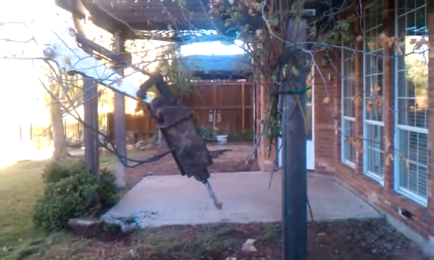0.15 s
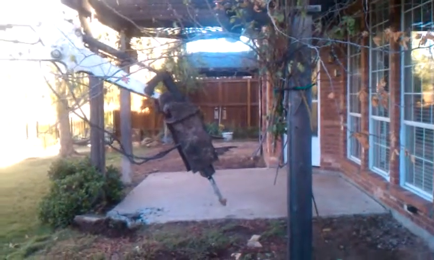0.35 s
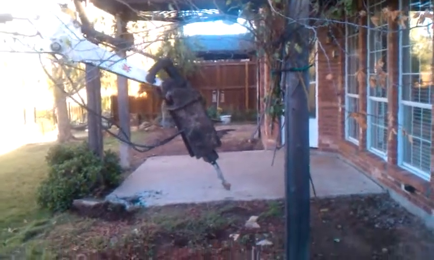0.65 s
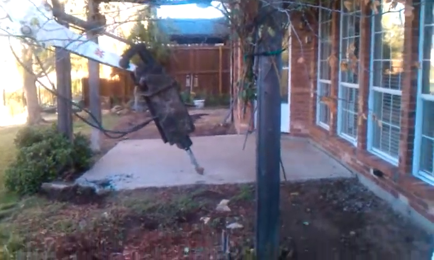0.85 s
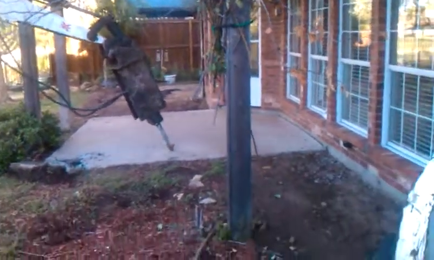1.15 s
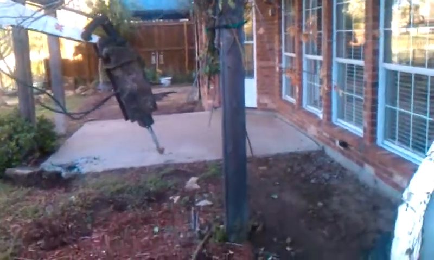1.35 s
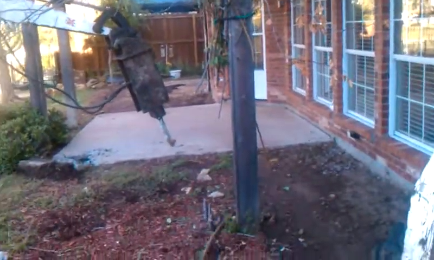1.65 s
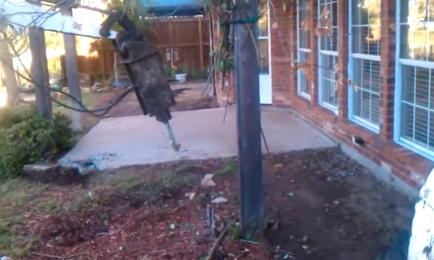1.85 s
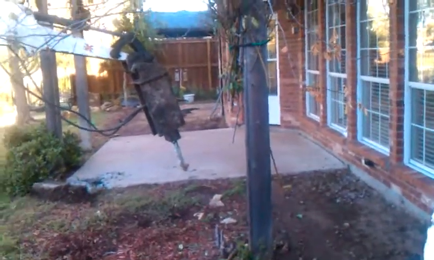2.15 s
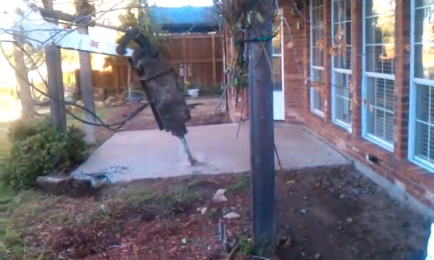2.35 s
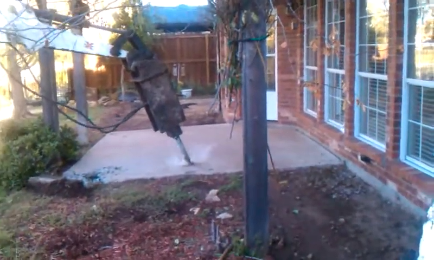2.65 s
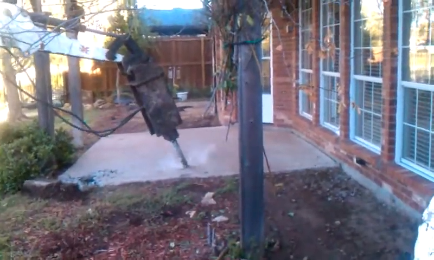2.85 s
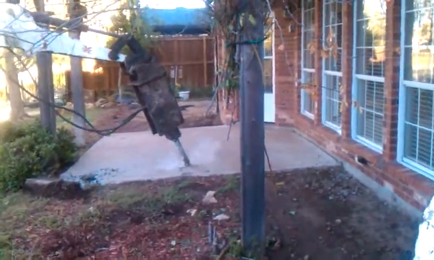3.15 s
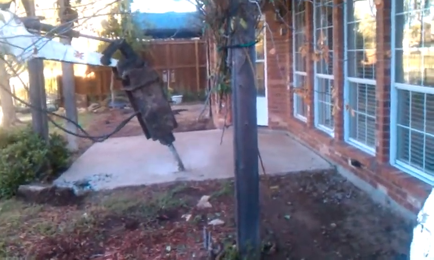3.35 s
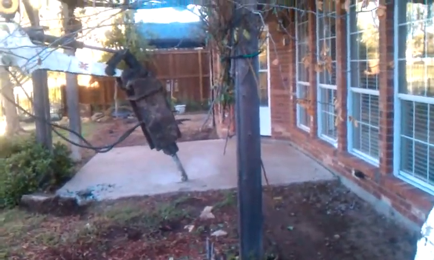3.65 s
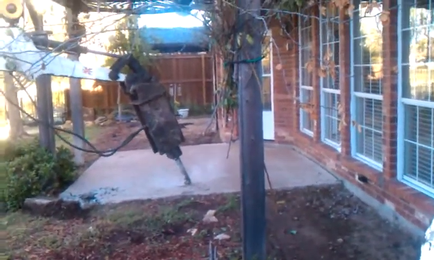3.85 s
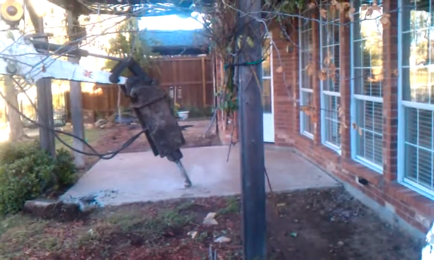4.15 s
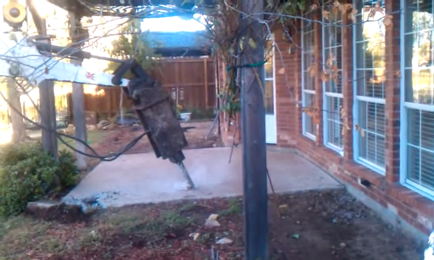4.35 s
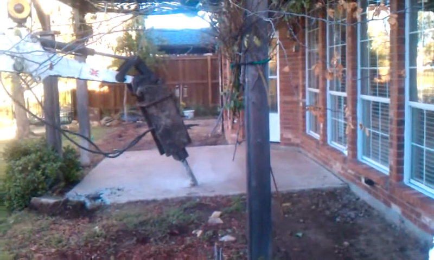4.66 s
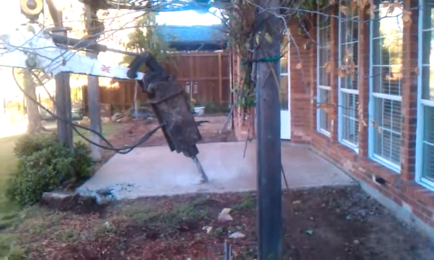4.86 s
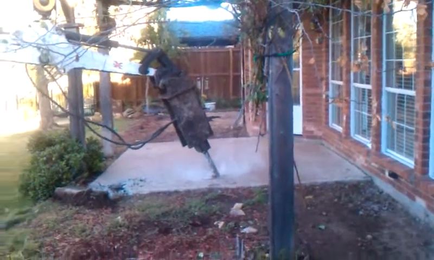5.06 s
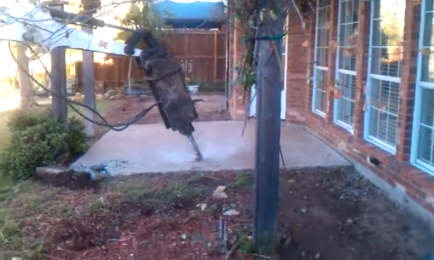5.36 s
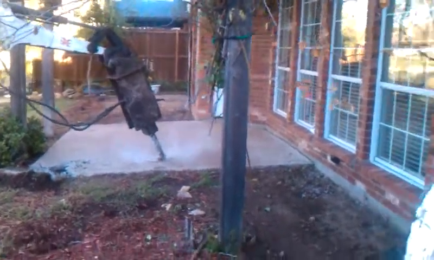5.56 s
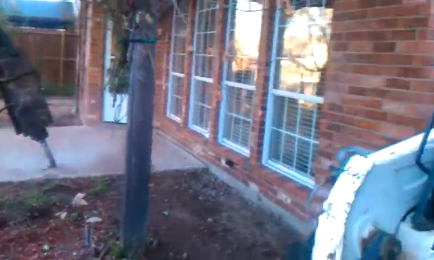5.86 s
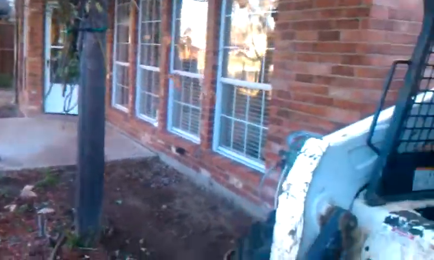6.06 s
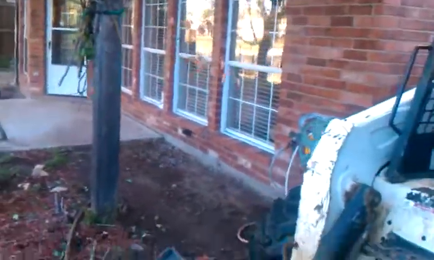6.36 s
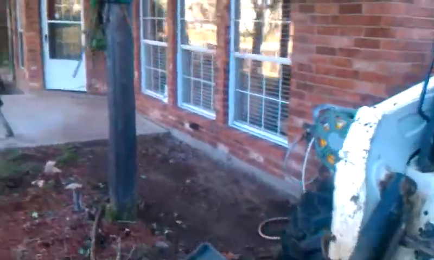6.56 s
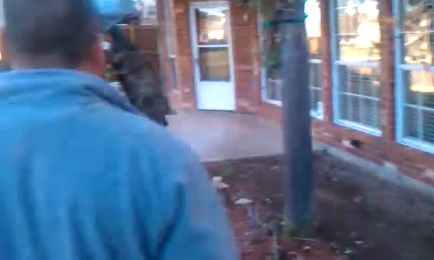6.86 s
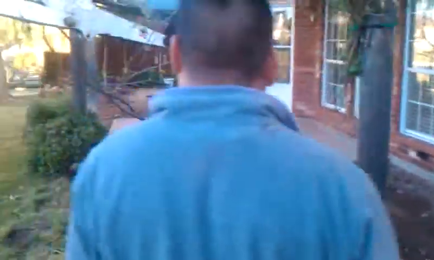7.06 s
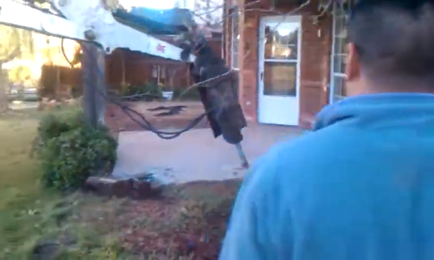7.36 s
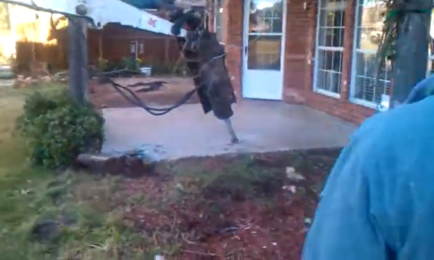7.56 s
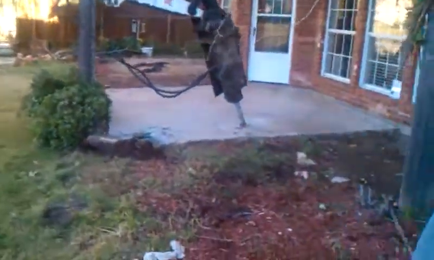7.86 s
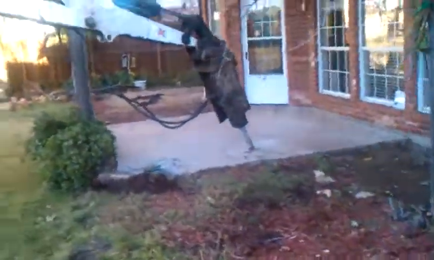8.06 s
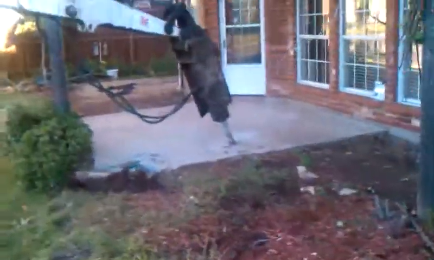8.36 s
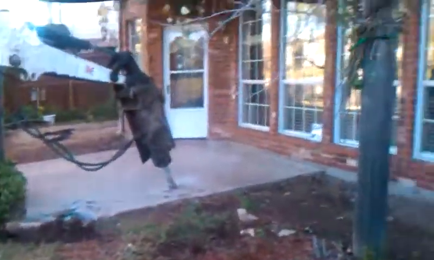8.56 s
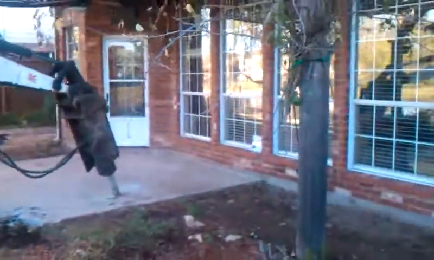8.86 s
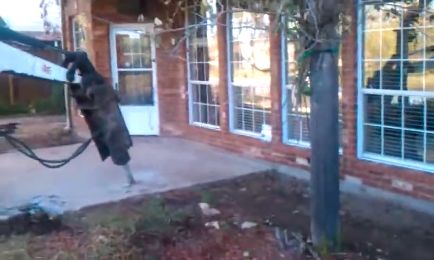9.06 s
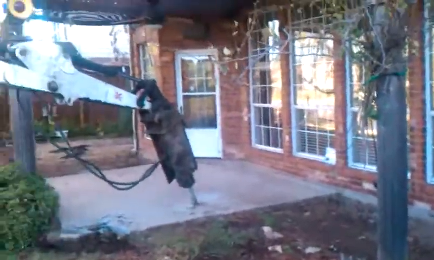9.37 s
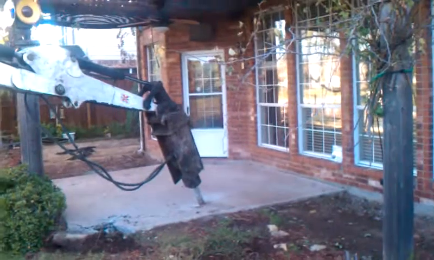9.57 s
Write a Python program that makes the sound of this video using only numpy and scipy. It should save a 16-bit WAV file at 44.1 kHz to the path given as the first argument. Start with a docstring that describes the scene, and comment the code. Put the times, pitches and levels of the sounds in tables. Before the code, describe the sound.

From 0 s a diesel engine clatters roughly, with a fluttering, narrow hiss of hydraulic oil. Dull knocks come at about 0.5, 0.7 and 0.9 s as a heavy chisel touches a concrete patio; a pump whine swells around 1.5 to 2 s, with another low thud near 1.9 s and the hiss rising. At 2.2 s one hard blow cracks and rings. From about 2.4 s the breaker hammers around nine times a second, with only a slight stumble near 4.2 s, where a faint dry tick falls. Blows boom low, clang and rattle with concrete grit, reflected by brick walls; early ones sing brightly. After 6 s the walking listener's shifting position changes the balance: panel ringing emerges, hiss swoops downward near 6.7 and 8.6 s, and hammering quickens to about ten a second, continuing to the end near 9.7 s. The microphone is narrow-band, with compressed level.

```python
"""A diesel engine clatters and oil hisses while a chisel is set down with dull knocks on a concrete patio.
Then the excavator's hydraulic breaker strikes once and hammers nine to ten times a second beside a brick wall.
Engine and pump are sines and pulsed noise at the firing rate; oil is narrow noise on gliding resonances.
Each blow is a click that drives echoes (boom, slab, steel, chips), thuds, noise bursts and ringing modes.
Level curves follow the listener's walk round the machine; a gain control holds down what exceeds its target."""
import sys
import numpy as np
from scipy import signal
from scipy.fft import rfft, irfft, next_fast_len
from scipy.io import wavfile
from scipy.ndimage import uniform_filter1d

SR = 44100
rng = np.random.default_rng(int(sys.argv[2]) if len(sys.argv) > 2 else 0)


def file_out(sig):
    """Save sig as 16-bit WAV at sys.argv[1]."""
    # one column per channel
    cols = np.atleast_2d(sig).T
    # limit, then scale
    lim = np.clip(cols, -1, 1)
    pcm = np.round(lim * 32767).astype(np.int16)
    wavfile.write(sys.argv[1], SR, pcm)


N = 429093
TIME = np.arange(N) / SR
FIRST_BLOW_S = 2.218
RETURN_S = 0.068  # from the blow to the piston's turn

# breaker parts along the walk: time_s, boom_db, housing_knock_db, slab_crack_db, housing_ring_db
PARTS_HEARD = [(2.3, 2.5, -9.5, 5, -14.5), (2.9, 3, -4, 3.5, -8.5), (3.3, 2.5, -1, 1.5, -2),
               (4.0, 4.5, 1.5, 5.5, 2), (4.4, 3.5, -0.5, 3, -4), (4.9, 3.5, 1.5, 3, -1.5),
               (5.7, 4.5, 0, 3.5, -3), (6.25, 5.5, -3, 7.5, -6), (6.65, 1, -18, 0.5, -13),
               (7.5, 1, -14, 4, -10), (8.5, -0.5, -6, 1, -10.5), (9.1, 1.5, -11.5, 1.5, -9),
               (9.7, 4.5, -6, -0.5, -15)]
# steel and tip along the walk: time_s, clang_and_chips_db, direct_crack_db
STEEL_HEARD = [(2.3, 0, -31), (3.3, -1.5, -25.5), (4.2, 1.5, -29.5), (6.15, -0.5, -24.5), (6.3, -1.5, -28),
               (6.55, -2.5, -30), (6.7, 1.5, -29), (7.3, 0, -26), (7.8, 0, -24), (9.7, -1.5, -23.5)]


def from_db(db):
    """Decibels to amplitude gain."""
    return 10 ** (np.asarray(db) / 20)


def rms_one(x):
    """Scale to unit rms."""
    return x / np.sqrt(np.mean(np.abs(x) ** 2) + 1e-20)


def in_time(rows):
    """Each column of a curve, interpolated at every sample."""
    s, *columns = np.transpose(rows)
    return [np.interp(TIME, s, column) for column in columns]


def low_pass(x, hz, order=2):
    """Butterworth low-pass."""
    return signal.sosfilt(signal.butter(order, hz, fs=SR, output="sos"), x)


def high_pass(x, hz, order):
    """Butterworth high-pass."""
    return signal.sosfilt(signal.butter(order, hz, "high", fs=SR, output="sos"), x)


def complex_noise():
    """White noise with independent real and imaginary parts, to be shifted in pitch."""
    return rng.standard_normal(N) + 1j * rng.standard_normal(N)


def drift(hz):
    """Random wander through normal knots of spread 1, hz knots per second."""
    knots = rng.standard_normal(int(N / SR * hz) + 2)
    return np.interp(TIME * hz, np.arange(len(knots)), knots)


def clicks(times_s, sizes):
    """Single-sample impulses."""
    out = np.zeros(N + SR)
    out[np.round(np.asarray(times_s) * SR).astype(int)] = sizes
    return out[:N]


def ring(drive, hz, t60_s):
    """Two-pole resonator: a unit click starts a decaying sine of height 1."""
    radius = from_db(-60 / (t60_s * SR))
    angle = 2 * np.pi * hz / SR
    return signal.lfilter([0, np.sin(angle)], [1, -2 * radius * np.cos(angle), radius ** 2], drive + 1e-18)


def knock(drive, hz, t60_s):
    """Soft contact: two equal resonators in series make the sine swell to height 1, then die."""
    rise = t60_s * SR / np.log(1000)
    return ring(ring(drive, hz, t60_s), hz, t60_s) * 2 * np.e / rise


def burst(drive, low_hz, high_hz, t60_s):
    """Each click starts decaying band noise, of rms 1 at first for a unit click."""
    band = signal.butter(2, [low_hz, high_hz], "band", fs=SR, output="sos")
    noise = signal.sosfilt(band, rng.standard_normal(N))
    decay = np.exp(-np.log(1000) / (t60_s * SR))
    return rms_one(noise) * signal.lfilter([1], [1, -decay], drive + 1e-18)


def modes(drive, table, waver_db, voice=ring):
    """Struck metal: each mode takes a wandering share of the drive; neighbours have opposite sign."""
    out = 0
    for k, (hz, db, t60_s) in enumerate(table):
        share = from_db(db + waver_db * drift(9))
        out = out + (-1) ** k * voice(drive * share, hz, t60_s)
    return out


def colour(x, spectrum):
    """Shape white sound of unit spread to a density in dB per Hz, falling off beyond the table's ends."""
    hz, db = np.transpose(spectrum)
    n = next_fast_len(N + SR // 10)
    log_hz = np.log(np.arange(n // 2 + 1) * SR / n + 1e-9)
    beyond = np.abs(log_hz - np.clip(log_hz, np.log(hz[0]), np.log(hz[-1])))
    gain = from_db(np.interp(log_hz, np.log(hz), db)) * np.exp(-2 * beyond)
    return irfft(rfft(x, n) * gain, n)[:N] * np.sqrt(SR / 2)


def shifting_colour(x, patchy_db, count=18):
    """No two blows break the concrete alike: overlapping bands swell and sink independently."""
    n = next_fast_len(N)
    spectrum = rfft(x, n)
    band = np.interp(np.arange(n // 2 + 1) * SR / n, [300, 4200], [0, count - 1])
    out = 0
    for k in range(count):
        part = irfft(spectrum * np.maximum(1 - np.abs(band - k), 0), n)[:N]
        out = out + from_db(patchy_db * drift(24)) * part
    return out


def echo_pattern(shape, count=4):
    """Dense echoes under an envelope, alternately flattened in spectrum and in time."""
    echoes = shape * rng.standard_normal(len(shape))
    for _ in range(count):
        echoes = irfft(np.exp(1j * np.angle(rfft(echoes))), len(shape))
        echoes = echoes * shape / np.sqrt(np.abs(uniform_filter1d(echoes ** 2, size=200)) + 1e-20)
    return echoes


def reverberate(drive, spectrum, hold_s, t60_s, alike, count):
    """Walls and roof hold each contact, then it decays: repeated echoes (power share alike) and fresh rattle."""
    shape = np.exp(-np.log(1000) * np.maximum(TIME[:SR // 3] - hold_s, 0) / t60_s)
    power = np.maximum(signal.oaconvolve(drive ** 2, shape ** 2)[:N], 0)
    scale = np.sqrt(power[TIME > FIRST_BLOW_S].mean())
    # the echo pattern changes from place to place along the walk
    place = np.interp(TIME, [FIRST_BLOW_S, TIME[-1]], [0, count - 1])
    echoes = 0
    for k in range(count):
        nearness = np.cos(np.pi / 2 * np.minimum(np.abs(place - k), 1))
        echoes = echoes + nearness * signal.oaconvolve(drive, echo_pattern(shape))[:N]
    rattle = np.sqrt(power) * rng.standard_normal(N)
    return colour(np.sqrt(alike) * echoes + np.sqrt(1 - alike) * rattle, spectrum) / scale


def pump_whine(firings):
    """Oil pump: a sine at six times the firing rate, louder while the boom presses the chisel down."""
    start_s, end_s, ramp_s = 1.5, 2, 0.31
    loaded_db, easy_db = -40.5, -56
    level_db = np.interp(TIME, [start_s - ramp_s, start_s, end_s, end_s + ramp_s],
                         [easy_db, loaded_db, loaded_db, easy_db])
    return np.sqrt(2) * from_db(level_db + 2.2 * drift(15)) * np.sin(2 * np.pi * 6 * firings)


def exhaust_and_fan(firings):
    """Exhaust harmonics of the firing rate and the cooling fan's hum, each wavering in level."""
    # firing_multiple, level_db
    exhaust_tones = [(1, -44.5), (2, -39.5), (3, -51), (4, -45)]
    out = 0
    for multiple, db in exhaust_tones:
        level = from_db(db + 0.96 * drift(11))
        out = out + level * np.sin(2 * np.pi * (multiple * firings + rng.random()))
    fan = from_db(-45 + 2 * drift(8)) * np.sin(2 * np.pi * 4.42 * firings)
    return np.sqrt(2) * (out + fan)


def clatter(firings):
    """Engine clatter: coloured noise in which each firing starts hard and fades, with uneven strength."""
    # pitch_hz, density_db_per_hz
    spectrum = [(30, -89.5), (55, -67.5), (85, -66), (130, -66), (210, -60), (300, -65.5), (390, -61),
                (600, -62.5), (800, -62), (950, -59), (1130, -62.5), (1250, -57.5), (1400, -58.5),
                (3000, -61), (4400, -78.5)]
    uneven_db = 0.99 * rng.standard_normal(int(firings[-1]) + 1)[firings.astype(int)]
    pulsing = rms_one(from_db(uneven_db - 2.5 * (firings % 1)))
    return pulsing * colour(rng.standard_normal(N), spectrum)


def oil_surges(blow_times_s):
    """Gain of the oil's hiss, rms 1 while hammering: it jumps with each blow and sinks until the next."""
    surge_db, decay_s = 3.5, 0.019  # the jump before scaling to rms 1
    since_s = TIME - np.r_[-1, blow_times_s][np.searchsorted(blow_times_s, TIME)]
    hammering = TIME > blow_times_s[0]
    surge = from_db(surge_db * np.exp(-since_s / decay_s))
    return np.where(hammering, surge / np.sqrt(np.mean(surge[hammering] ** 2)), 1)


def oil_hiss(firings, blow_times_s):
    """Oil rushing through the valve block: noise bands on a gliding resonance and two multiples of it."""
    # time_s, resonance_hz, level_db
    flow = [(0, 1760, -30), (.9, 1745, -31), (1.4, 1777, -30), (2.19, 1862, -23.5), (2.28, 1957, -28.5),
            (4, 2100, -30.5), (5.9, 1695, -30.5), (6.5, 1505, -26), (8.3, 1475, -27.5), (9.73, 1421, -30)]
    # resonance_multiple, width_hz, level_db
    valve_bands = [(1, 220, 2.5), (1.26, 242, -5), (1.55, 140.5, -6)]
    oil_hz, oil_db = in_time(flow)
    wander = np.where(TIME > blow_times_s[0], 0.024, 0.011)  # hammering unsettles the flow
    phase = 2 * np.pi * np.cumsum(oil_hz * (1 + wander * drift(16))) / SR
    oil = 0
    for multiple, width_hz, db in valve_bands:
        swirl = low_pass(low_pass(complex_noise(), width_hz / 2, order=1), 600)
        clumps = from_db(2 * drift(36) + 2.3 * drift(350))
        oil = oil + from_db(db) * rms_one(clumps * (swirl * np.exp(1j * multiple * phase)).real)
    flutter_db = 1.0 * np.cos(2 * np.pi * firings)  # the pump pushes harder at each firing
    return from_db(oil_db + flutter_db) * oil_surges(blow_times_s) * oil


def excavator(blow_times_s):
    """Exhaust, fan, pump and clatter share one wandering count of diesel firings; the oil flutters with it."""
    # time_s, firings_per_s, clatter_db, exhaust_and_fan_db
    engine = [(0, 88, 0, -10), (.65, 91, -0.3, -1), (1.0, 89, 0, -1), (2.15, 92, 2.5, 0), (2.5, 90, 2, -5),
              (5.5, 87, 4.5, 1.5), (7, 87, 5, -3.5), (9.73, 93.5, 5, -4)]
    firing_hz, clatter_db, exhaust_db = in_time(engine)
    firings = np.cumsum(firing_hz * (1 + 0.004 * drift(14))) / SR
    tones = from_db(exhaust_db) * exhaust_and_fan(firings) + pump_whine(firings)
    return tones + from_db(clatter_db) * clatter(firings) + oil_hiss(firings, blow_times_s)


def swoops(width_hz=300):
    """The oil's hiss swoops down as the listener turns: a narrow noise band swells, slides and fades."""
    # centre_s, length_s, from_hz, to_hz, level_db
    slides = [(6.715, .55, 2533, 1837, -27), (8.57, .2, 2223, 1750, -23.5)]
    swirl = low_pass(complex_noise(), width_hz / 2)
    out = 0
    for s, length_s, from_hz, to_hz, db in slides:
        hz = np.interp(TIME, [s - length_s / 2, s + length_s / 2], [from_hz, to_hz])
        hiss = rms_one((swirl * np.exp(2j * np.pi * np.cumsum(hz) / SR)).real)
        swell = np.exp(-np.minimum(np.abs(2 * (TIME - s) / length_s), 2 * np.e) ** 2)
        out = out + from_db(db) * swell * hiss
    return out


def tick():
    """One faint dry tick: a click through a one-pole filter."""
    return signal.lfilter([1], [1, -0.9], clicks([4.199], from_db(-12.5)))


def knocks():
    """The chisel is set down: decaying noise and a soft ring at each contact, the last with the first blow."""
    # start_s, noise_db, upper_edge_hz, noise_t60_s, ring_hz, ring_db
    contacts = [(.512, -29.5, 1400, .06, 876, -27), (0.737, -26.5, 503, 0.07, 375, -28),
                (.92, -19, 2183, 0.084, 248, -33), (0.934, -22, 596, 0.09, 196, -20),
                (1.862, -31, 262, .15, 168, -19.5), (2.218, -14, 3600, 0.036, 980, -24)]
    white = high_pass(rng.standard_normal(N), 145, order=4)
    out = 0
    for s, db, top_hz, t60_s, ring_hz, ring_db in contacts:
        envelope = (TIME >= s) * np.exp(-np.log(1000) * np.clip(TIME - s, 0, 1) / t60_s)
        noise = from_db(db) * rms_one(low_pass(white, top_hz, order=3)) * envelope
        out = out + noise + knock(clicks([s], from_db(ring_db)), ring_hz, t60_s=0.067)
    return out


def blows():
    """Times and strengths (dB) of the blows: one alone, then two runs with a gap shorter than one blow between
    them."""
    # start_s, end_s
    runs = [(2.362, 4.21), (4.256, 9.7)]
    # hammering follows the oil flow: time_s, blows_per_s
    rate = [(2.4, 8.806), (2.85, 9.021), (3.3, 8.537), (4.2, 9.239), (5.5, 9.46), (6.5, 9.671),
            (6.85, 10.067), (7.9, 10.195), (8.3, 9.868), (8.8, 10.285)]
    times_s = []
    for s, end_s in runs:
        while s < end_s:
            times_s.append(s)
            s += 1 / np.interp(s, *np.transpose(rate))
    return np.r_[FIRST_BLOW_S, times_s], np.r_[0, rng.normal(0, 0.5, len(times_s))]


def after(hits, delay_s, db):
    """A further contact after each blow, a little uneven in time and strength."""
    jitter, spread_db = 0.008, 0.24  # jitter is a share of the delay
    s, blow_db = hits
    late, strong = rng.standard_normal((len(s), 2)).T
    return clicks(s + delay_s * (1 + jitter * late), from_db(blow_db + db + spread_db * strong))


def boom(hits, strike):
    """Ground, slab and steel boom low under the blow and again as the piston turns."""
    # pitch_hz, density_db_per_hz
    spectrum = [(30, -83.5), (50, -69), (80, -61), (125, -59.5), (172, -54), (205, -58), (240, -53.5),
                (290, -55), (380, -59), (480, -62), (700, -81.5)]
    boom_db = in_time(PARTS_HEARD)[0]
    drive = strike + after(hits, RETURN_S, -2.0)
    return from_db(boom_db) * reverberate(drive, spectrum, hold_s=0.04, t60_s=0.22, alike=0.46, count=5)


def thuds(hits):
    """The machine's weight lands as it recoils, settles and the piston turns; the slab rings on a little."""
    # delay_s, pitch_hz, t60_s
    landings = [(0.0106, 185, 0.054), (.026, 227.4, .04), (.0705, 205, .038)]
    # along the walk: time_s, recoil_db, settling_db, return_db
    heard = [(2.3, -30.5, -37, -39.5), (2.75, -25, -36.5, -36.5), (3.3, -23.5, -28, -35),
             (3.7, -17.5, -20.5, -28.5), (4.6, -18.5, -25, -26), (5.7, -17, -25, -29),
             (6.3, -19.5, -21, -22), (6.5, -21, -20, -27), (6.65, -29.5, -27, -23.5),
             (7.5, -29.5, -23, -20.5), (8.05, -40, -33, -29.5), (8.18, -23, -20.5, -17),
             (8.5, -30, -30, -25.5), (8.9, -24, -27, -18.5), (9.6, -24.5, -20, -20)]
    s, *levels = np.transpose(heard)
    drives, out = 0, 0
    for (delay_s, hz, t60_s), db in zip(landings, levels):
        drive = after(hits, delay_s, np.interp(hits[0], s, db))
        drives = drives + drive
        out = out + knock(drive, hz, t60_s)
    return out + from_db(-8) * ring(drives, hz=177.4, t60_s=0.16)


def clang(strike):
    """The slab cracks and the steel clangs, roughened by crumbling concrete."""
    # pitch_hz, density_db_per_hz
    slab_spectrum = [(250, -83), (400, -66), (520, -59.5), (610, -59.5), (780, -58.5), (930, -62.5),
                     (1120, -59.5), (1240, -60.5), (1500, -69), (2200, -74.5)]
    # pitch_hz, density_db_per_hz
    steel_spectrum = [(700, -77), (1300, -68), (1700, -63), (2100, -59.5), (2500, -60), (2950, -63.5),
                      (3350, -59), (3750, -64.5), (4230, -69.5), (4550, -82.5)]
    slab_db, clang_db = in_time(PARTS_HEARD)[2], in_time(STEEL_HEARD)[0]
    slab = reverberate(strike, slab_spectrum, hold_s=0.048, t60_s=0.3, alike=0.5, count=4)
    steel = reverberate(strike, steel_spectrum, hold_s=0.033, t60_s=0.59, alike=0.45, count=4)
    grit = from_db(1.5 * drift(300))
    return shifting_colour(from_db(slab_db) * slab + from_db(2 + clang_db) * steel * grit, patchy_db=3.0)


def chips(strike):
    """Concrete splinters under the tip: mostly fresh rattle, with a fast flicker in level."""
    # pitch_hz, density_db_per_hz
    spectrum = [(2900, -76.5), (3500, -63.5), (3900, -59), (4250, -61.5), (4550, -78.5)]
    clang_db = in_time(STEEL_HEARD)[0]
    splinters = reverberate(strike, spectrum, hold_s=0.042, t60_s=0.32, alike=0.092, count=2)
    return splinters * from_db(clang_db + 3.5 * drift(450))


def bright_contacts(hits, strike):
    """Noise bursts: a crack straight from the tip, then a clack as the piston turns round."""
    crack_db = in_time(STEEL_HEARD)[1]
    crack = from_db(crack_db) * burst(strike, low_hz=1100, high_hz=2800, t60_s=0.051)
    return crack + burst(after(hits, RETURN_S, -24.5), low_hz=2900, high_hz=3700, t60_s=0.044)


def housing(hits, strike):
    """Breaker housing: two modes knock at three jolts a stroke; the others ring at blow and rebound."""
    # pitch_hz, level_db, t60_s
    housing_modes = [(387.6, -22.5, .05), (464, -30, 0.032), (525, -31.5, 0.074), (666, -25.5, 0.13),
                     (831, -26, .07), (1233, -27.5, 0.14)]
    # delay_s, level_db
    shakes = [(0, -2.5), (.019, -2), (.060, 2)]
    _, knock_db, _, ring_db = in_time(PARTS_HEARD)
    shaking = sum(after(hits, s, db) for s, db in shakes)
    rebounding = strike + after(hits, 0.0365, -4.0)  # the machine settles a second time
    knocking = from_db(knock_db) * modes(shaking, housing_modes[:2], waver_db=1.5, voice=knock)
    return knocking + from_db(ring_db) * modes(rebounding, housing_modes[2:], waver_db=-0.5, voice=knock)


def panel(hits, strike):
    """A steel panel of the machine rings at blow and return, heard late in the walk."""
    # pitch_hz, level_db, t60_s
    panel_modes = [(1262, -31, 0.092), (1440, -30, .07), (1522, -27.5, .08)]
    # time_s, level_db
    heard = [(6, -15), (6.4, 0), (7.5, 1.5), (8.4, -0.5), (9.7, -4)]
    drive = strike + after(hits, RETURN_S, -3)
    return from_db(in_time(heard)[0]) * modes(drive, panel_modes, waver_db=3.5, voice=knock)


def chisel(strike):
    """The chisel rings under every blow, muffled as it sinks in, and sings out where it bounces clear."""
    # pitch_hz, level_db, t60_s
    chisel_modes = [(1950, -28, 0.3), (2100, -34, 0.13), (3305, -29, 0.39), (3415, -29, 0.56)]
    # time_s, level_db, favoured_hz
    bounces = [(2.222, 7.5, 3460), (2.483, 10.5, 3295), (2.707, 7.5, 3295), (3.043, 3, 3295),
               (3.157, 1.5, 3295), (3.845, 4, 3460)]
    free_db, buried_db, sink_s = 0, -8.5, 1.2
    free = np.exp(-np.maximum(TIME - FIRST_BLOW_S, 0) / sink_s)
    level_db = buried_db + (free_db - buried_db) * free
    s, db, favoured_hz = np.transpose(bounces)
    singing = 0
    for hz, mode_db, t60_s in chisel_modes:
        # modes away from the favoured one ring up to 11.5 dB less
        loss_db = 11.5 * np.tanh(np.abs(hz - favoured_hz) / 100)
        singing = singing + ring(clicks(s, from_db(db + mode_db - loss_db)), hz, t60_s)
    return from_db(level_db) * modes(strike, chisel_modes, waver_db=4.5) + singing


def breaker(hits):
    """Every blow is one click that drives ground, slab, steel, tip, housing, panel and chisel."""
    strike = clicks(hits[0], from_db(hits[1]))
    concrete = boom(hits, strike) + thuds(hits) + clang(strike) + chips(strike)
    metal = bright_contacts(hits, strike) + housing(hits, strike) + panel(hits, strike) + chisel(strike)
    return concrete + metal


def scene():
    """Machine and breaker at one microphone."""
    hits = blows()
    return (excavator(hits[0]) + swoops() + knocks() + breaker(hits))[None]


def gain_control(x, target_db, release_db_per_s, sense_s):
    """The gain drops as soon as the smoothed level exceeds the target and creeps back."""
    keep = np.exp(-1 / (sense_s * SR))
    level_db = 10 * np.log10(signal.lfilter([1 - keep], [1, -keep], x[0] ** 2) + 1e-12)
    fall_db = release_db_per_s * TIME
    held_db = np.maximum.accumulate(level_db + fall_db) - fall_db
    return x * from_db(-np.maximum(held_db - target_db, 0))


def steep_cut(x, hz):
    """Elliptic low-pass, 0.1 dB ripple and 90 dB stopband."""
    return signal.sosfilt(signal.ellip(10, 0.1, 90, hz, fs=SR, output="sos"), x)


def record(dry):
    """Narrow-band recorder: thin bass, treble roll-off, gain control, steep cut; the tick joins after it."""
    thin = high_pass(dry, 32, order=2)
    dull = low_pass(thin, 3664, order=12)
    levelled = gain_control(dull, target_db=-22.0, release_db_per_s=0.5, sense_s=0.047)
    narrow = steep_cut(levelled, 4500)
    return steep_cut(narrow + tick(), 16000)


dry = scene()
out = record(dry)
file_out(out)
```